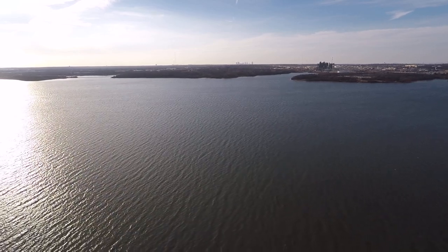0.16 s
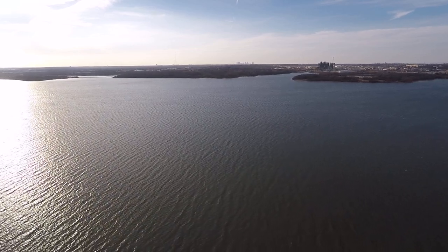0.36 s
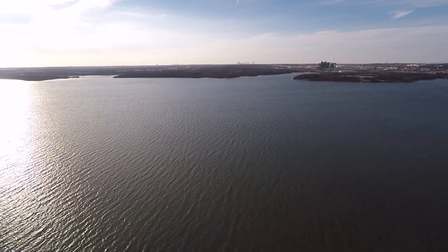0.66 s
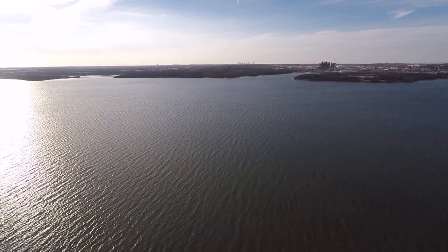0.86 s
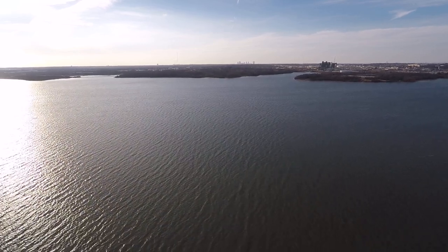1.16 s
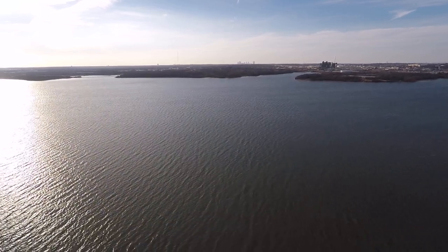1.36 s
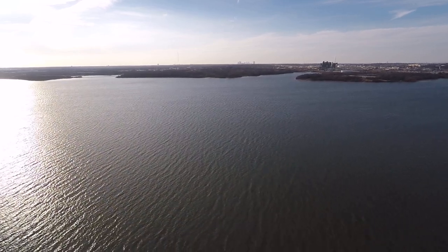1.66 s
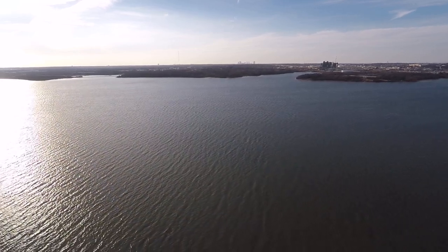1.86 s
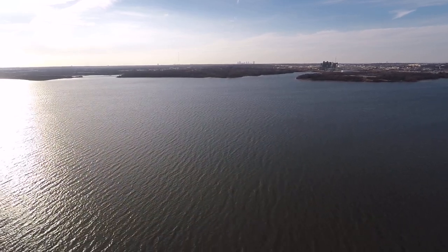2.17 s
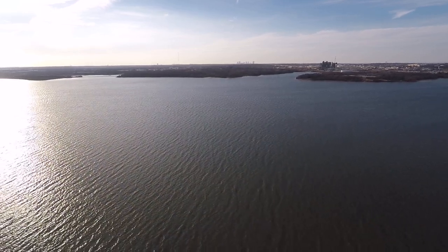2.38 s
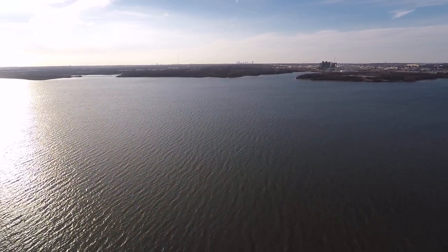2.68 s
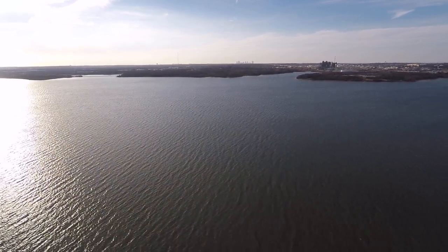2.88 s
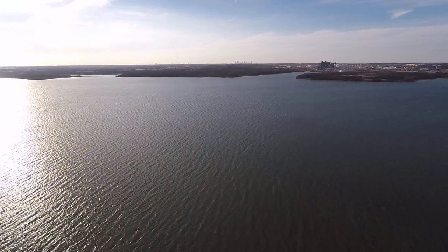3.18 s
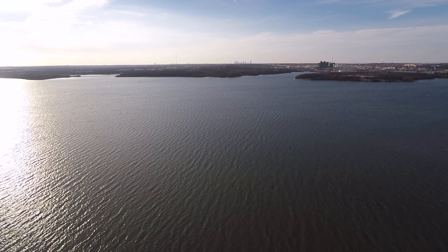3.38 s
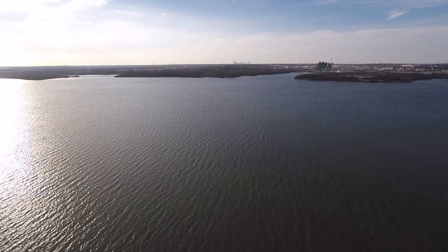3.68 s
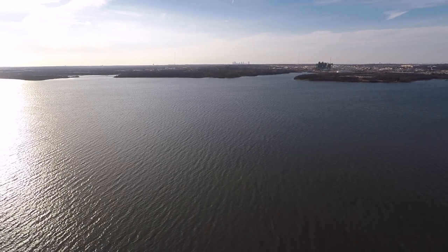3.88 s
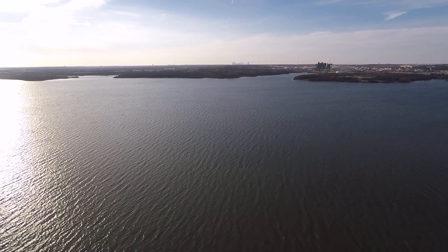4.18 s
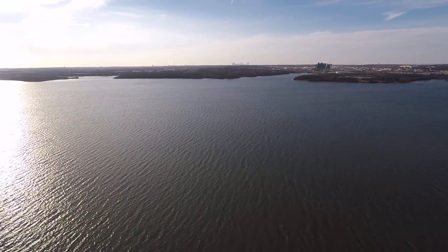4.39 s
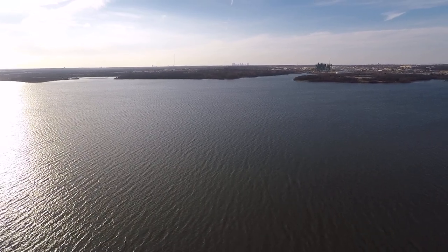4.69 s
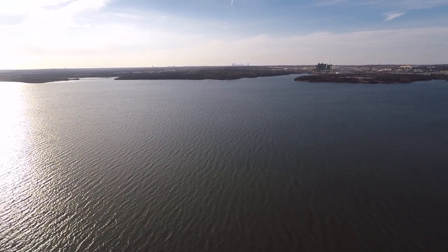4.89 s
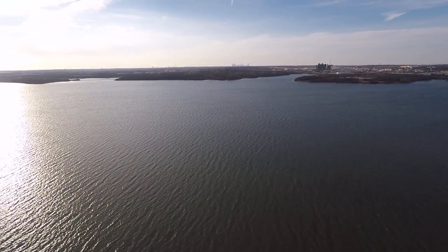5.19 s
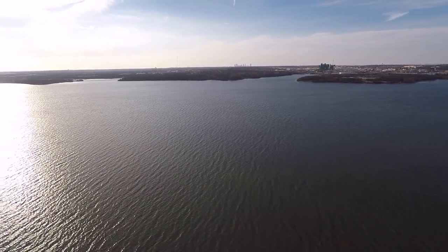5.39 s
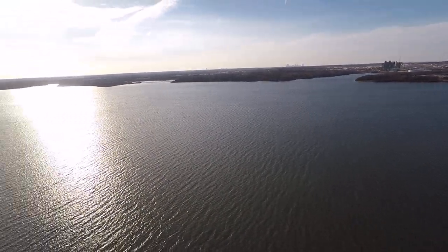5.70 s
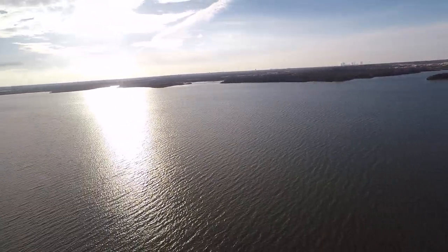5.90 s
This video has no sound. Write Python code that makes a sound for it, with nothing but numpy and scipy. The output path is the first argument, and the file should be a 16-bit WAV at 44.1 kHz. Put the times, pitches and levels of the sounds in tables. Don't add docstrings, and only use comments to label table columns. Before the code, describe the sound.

Steady rapid blade flutter and low hum in rumbling wind, breaking after three seconds into uneven roar, motor chirps, hiss and popping gusts.

```python
import sys
import numpy as np
from scipy import signal
from scipy.fft import rfft, irfft
from scipy.io import wavfile
from scipy.ndimage import uniform_filter1d

SR = 44100
rng = np.random.default_rng(int(sys.argv[2]) if len(sys.argv) > 2 else 0)


def ratio(d):
    e = np.asarray(d, float) / 20
    return 10 ** e


def inscribe(sig):
    pcm = np.round(np.clip(np.atleast_2d(sig).T, -1, 1) * 32767)
    wavfile.write(sys.argv[1], SR, pcm.astype(np.int16))


N = 266800
TIME, HZ = np.arange(N) / SR, np.fft.rfftfreq(N, 1 / SR)

# t/s, level/dB
WIND = [(0, -18), (1.41, -17), (1.54, -24), (1.65, -17.5), (3.16, -17.5), (3.3, -24), (3.75, -26.5),
        (3.93, -21), (3.99, -17), (4.47, -14), (4.6, -27.5), (4.87, -17.5), (5.17, -16.5), (5.44, -13),
        (5.52, -23), (5.56, -12), (5.76, -20.5), (6.05, -19)]
# f/Hz, density/dB per Hz
RUMBLE = [(20, -13), (40, -1), (80, 7), (150, 6), (190, -3), (230, -8), (400, -14), (800, -68)]
# f/Hz, density/dB per Hz
BUFFET = [(120, -31), (200, 4), (260, 3.5), (400, -4), (800, -52)]
# t/s, motor effort/dB, airspeed at the blade tips/dB
MOTORS = [(0, -3, 1.5), (3.03, 1, 1), (3.18, -3.5, -1), (3.45, 1.5, 4), (3.82, 4, 8), (4.11, 2.5, 12.5),
          (4.48, 0, 7.5), (4.7, 6, 7), (5.06, 7, 9.5), (5.27, 7.5, 11), (5.42, 6.5, 10.5), (5.62, 5.5, 7.5),
          (5.68, 2, -1), (5.9, 0, 4), (6.05, 4, 7)]
# f/Hz, density/dB per Hz
ROAR = [(200, -26), (400, 3), (800, 3), (1500, -2), (3000, -10), (3900, -13), (5000, -20), (7000, -39.5),
        (10000, -55)]
# f/Hz, density/dB per Hz
HISS = [(2200, -30), (4200, 5), (6000, 2), (8000, 0), (9700, -2), (11000, -7), (12500, -5), (13600, -9),
        (15500, -7)]
# t/s, length/s, start f/Hz, end f/Hz, level/dB
SPURS = [(3.29, .07, 4020, 3900, -47), (3.365, .1, 3870, 3960, -43), (3.54, .12, 3540, 3960, -42),
         (3.66, .06, 3940, 3880, -45), (3.79, .1, 3500, 3930, -41), (3.88, .13, 3250, 4000, -41),
         (4.05, .07, 3540, 3620, -39), (4.14, .11, 3900, 4030, -42), (4.19, .11, 3640, 3500, -40),
         (4.318, .15, 3660, 3720, -40), (4.64, .21, 3660, 3930, -41), (4.87, .29, 3800, 3830, -41),
         (4.88, .17, 3580, 3630, -44), (5.16, .07, 3860, 3800, -41), (5.23, .09, 3760, 3880, -40),
         (5.32, .14, 3680, 3874, -39), (5.49, .14, 3780, 3960, -40), (5.677, .12, 3820, 3800, -48),
         (5.9, .08, 3850, 3870, -50)]
# t/s, peak level/dB, f/Hz
BLOWS = [(0.207, -10, 674), (0.253, -4, 680), (0.861, -12, 622), (3.157, -3, 918), (3.184, -18, 560),
         (3.261, -5.5, 609.3), (3.967, -9, 586), (3.989, -3, 552), (4.116, -2, 665), (4.146, -1, 590),
         (4.211, -6, 570), (4.306, 1.5, 650), (4.312, -2.5, 734), (4.318, -10, 552), (4.332, -5.5, 587),
         (4.352, -2.5, 630), (4.375, -1, 695), (4.387, 4, 550), (4.421, 0, 830), (4.554, -14, 592),
         (4.64, -4, 573), (4.665, -6, 567), (4.707, -10, 567), (4.858, -12, 840), (5.354, -0.5, 527),
         (5.657, 0, 571), (5.733, -6, 579), (5.981, -6, 711)]
# t/s, peak level/dB, top end relative level/dB
CRACKS = [(0.242, -18, -29), (0.3031, -12, -20), (0.343, -18, -24), (.4012, -18.5, -17), (.6951, -10, -24),
          (.7791, -13, -8), (.811, -13, -19), (0.9292, -14, -26), (1.1505, -13, -23), (1.1725, -14, -12),
          (1.4114, -19, -31), (1.681, -15, -29), (1.9902, -15, -22), (2.0883, -12.5, -24),
          (2.5028, -11, -33), (2.802, -18, -28), (2.9627, -13, -24), (3.038, -14, -8), (3.263, -24, -22),
          (4.3054, -15, -26), (4.3893, -16, -29), (4.4573, -9.5, -30), (4.4623, -10, -24),
          (4.5077, -11, -35), (4.561, -13, -17), (4.5858, -11, -24), (5.238, -10, -24), (5.6287, -11, -22),
          (5.6657, -14.5, -8), (5.7513, -14, -29)]
# t/s, peak level/dB, top end relative level/dB
CRACKLE = [(3.0715, -17, -10), (3.0864, -18, -16), (3.1014, -17, -25), (3.1133, -21, -14),
           (3.1187, -18, -12), (3.1238, -11, -9), (3.1403, -16, -1), (3.1466, -18, -12), (3.157, -21, -22),
           (3.168, -18, -18), (3.1842, -22, -28), (3.1904, -24, -28)]
# t/s, level/dB
WASH = [(0, -20), (3.0, -20.5), (3.185, -18.5), (3.205, -28.5), (3.41, -43), (3.82, -42), (3.95, -38),
        (4.0, -24), (4.08, -26.5), (4.13, -22), (4.47, -21.5), (4.58, -18), (4.66, -24), (5.15, -26),
        (5.44, -23), (5.52, -23), (5.78, -17.5), (5.93, -35.5)]
# t/s, unrest/0-1, lumps in slap size/dB, treble tilt/dB a part
AIR = [(0, 0, 1.4, .5), (3.0, 0.04, 1.4, -0.5), (3.15, 0.32, 1, 2.5), (3.3, 1, 3.5, 1),
       (3.9, 0.7, 2.3, -1.5), (4.05, 0.62, 6, -0.5), (4.65, 0.42, 4.5, -2), (4.8, 1, 3, 1),
       (5.55, 0.64, 2.5, 1.5), (5.7, 0.77, 3, -1.5), (6.05, 1, 4, -4)]
# f/Hz, density/dB per Hz
SLAP = [(60, -18.5), (150, -8), (300, -9.5), (550, -11), (1000, -17.5), (2000, -24.5), (4000, -37.5),
        (7000, -53), (10000, -60), (15500, -95)]
# centre f/Hz, length/ms, own size scatter level/dB
PARTS = [(305, 2.57, -0.5), (980, 1.48, 0), (2540, 1.08, -2.5), (5650, 0.54, 4.5), (12200, 0.4, 19)]
# t/s, blade passes/Hz, hum level/dB
ROTOR = [(0, 181, -20), (.36, 186, -16), (.6, 181, -18), (1.2, 178, -17.5), (1.45, 186.4, -17),
         (1.92, 186.5, -15), (2.02, 177, -17), (2.36, 182, -18.5), (2.55, 178.6, -17.5), (3.05, 186, -18),
         (3.14, 199, -18), (3.27, 171, -26.5), (3.45, 156, -26.5), (3.93, 155, -25), (4.4, 169, -27.5),
         (4.62, 170, -17), (5.75, 173.5, -17.5), (6.05, 176, -30)]
# multiple of the blade rate, level relative to the second tone/dB
HUM = [(3, -12), (4, -12), (5, -12), (7, -19)]
# t/s, length/s, depth level/dB
GAPS = [
    (0.51, 0.065, -5),
    (0.744, .07, -7),
    (4.1, .25, -19),
    (4.497, 0.061, 2),
    (4.83, .09, -13),
    (4.997, 0.16, -5.5),
    (5.5, 0.062, -3),
    (5.687, .04, -12.5),
]


def evened(x, size=N):
    return x / np.sqrt(abs(uniform_filter1d(x ** 2, size)) + 1e-20)


def curves(rows, t=TIME):
    s, *columns = np.transpose(rows)
    return [np.interp(t, s, c) for c in columns]


def coloured(x, points):
    f, db = np.transpose(points)
    return irfft(rfft(x) * ratio(np.interp(np.log(HZ + 1), np.log(f), db)), N)


def drift(rate_hz):
    return evened(irfft(rfft(rng.standard_normal(N)) / (1 + (HZ / rate_hz) ** 4), N))


def burst(at, size, ms):
    train = np.bincount(at, size, N)[:N]
    bell = np.exp(-.5 * (np.arange(-300, 301) / SR / (ms / 2000)) ** 2)
    return signal.oaconvolve(train, bell, "same")


def wind():
    wash_db, turn = curves(WASH)[0], curves(AIR)[0]
    buffet_db = -21.5 + 1.06 * (wash_db + 20.5) + 7.5 * turn
    air = rng.standard_normal(N) * ratio(0.59 * drift(22))
    rumble = ratio(curves(WIND)[0] + 1.35) * evened(coloured(air, RUMBLE), size=SR // 4)
    return rumble + ratio(buffet_db - 4.5) * evened(coloured(air, BUFFET), size=SR // 8)


def motors():
    effort_db, tips_db = curves(MOTORS)
    roar_db, hiss_db = -32.5, -53
    air = rng.standard_normal(N) * ratio(1.57 * drift(270))
    roar = ratio(roar_db + effort_db) * evened(coloured(air, ROAR))
    return roar + ratio(hiss_db + tips_db) * evened(coloured(air, HISS))


def whine(turns):
    line_db = -47.5 - 10 * curves(AIR)[0] + 2.5 * drift(8)
    out = ratio(line_db) * np.sin(2 * np.pi * 21 * turns)
    waver, flutter = 1 + .005 * drift(30), ratio(1.8 * drift(25) - 1)
    for s, length, start_hz, end_hz, db in SPURS:
        part = slice(round(s * SR), round((s + length) * SR))
        glide = np.linspace(start_hz, end_hz, part.stop - part.start)
        partner_db = -57 + 1.5 * abs(end_hz - start_hz) / length / 1000
        cycles = np.cumsum(glide * waver[part]) / SR
        partner = ratio(partner_db - db) * np.sin(2 * np.pi * cycles * 4 / 3)
        orders = np.sin(2 * np.pi * cycles) + partner
        out[part] += ratio(db) * flutter[part] * orders * signal.windows.tukey(len(glide), .3)
    return out


def blows():
    out = np.zeros(N + SR)
    for s, db, hz in BLOWS:
        u = np.arange(0, 4, hz / SR)
        swing = -np.sin(2 * np.pi * u ** 0.54 * 1.18) * u * np.exp(-u / 0.48)
        start = round((s + .0012) * SR)
        out[start:][:len(u)] += ratio(db - 2.5) * swing / abs(swing).max()
    s, db = np.transpose(BLOWS)[:2]
    edge = ((s + .0015) * SR).astype(int)
    spit = rng.standard_normal(N) * burst(edge, ratio(db + 3), 1.1)
    return out[:N] + coloured(spit, [(300, -36), (900, -4), (2000, -19.5), (4000, -16.5), (8000, -44)])


def cracks():
    s, crack_db, top_db = np.transpose(CRACKS + CRACKLE)
    at = (s * SR).astype(int) + 30
    air = evened(rng.standard_normal(N), size=30)
    bright = [(1200, 3), (3000, 5.5), (6000, -3.5), (9000, -32)]
    top = [(5000, -6), (8000, 12.5), (11000, 0), (15900, -20)]
    crack = coloured(air * burst(at, ratio(crack_db - 3.0), 1.25), bright)
    return crack + coloured(air * burst(at, ratio(crack_db + top_db - 8), 0.37), top)


def slaps(turns):
    at = np.flatnonzero(np.diff(np.floor(turns)) > 0)
    unrest, spread_db = curves(AIR, at / SR)[:2]
    calm_scatter, rough_scatter = 0.099, 0.27
    scatter = calm_scatter + (rough_scatter - calm_scatter) * unrest
    luck = rng.standard_normal((2 + 2 * len(PARTS), len(at)))
    period = SR / curves(ROTOR, at / SR)[0]
    shared_db = spread_db * luck[1] + 1.0 * (-1.) ** np.arange(len(at))
    air, spectrum = rng.standard_normal(N), 0
    tilt_db = curves(AIR)[2]
    centres = np.log([p[0] for p in PARTS])
    for k, (hz, ms, own_db) in enumerate(PARTS):
        place = at + period * (scatter * luck[0] + 0.047 * luck[2 + 2 * k])
        size = ratio(shared_db + own_db * luck[3 + 2 * k])
        envelope = burst(np.clip(place, 0, N - 1).astype(int), size, ms)
        envelope = evened(envelope, size=SR // 8) + .2
        envelope *= ratio(tilt_db * (k - 3))
        share = np.interp(np.log(HZ + 1), centres, np.arange(len(PARTS)) == k)
        spectrum = spectrum + share * rfft(air * envelope)
    wash = evened(coloured(irfft(spectrum, N), SLAP), size=SR // 6)
    return ratio(curves(WASH)[0] + 4.5) * wash


def hum(turns):
    first_db = curves(ROTOR)[1]
    for s, length, depth_db in GAPS:
        first_db = first_db + depth_db * np.exp(-((TIME - s) / (length / 2)) ** 2)
    lumps_db = curves(AIR)[1]
    second_db = first_db - 4.5 - 1.34 * lumps_db
    levels = [(1, first_db), (2, second_db)] + [(k, second_db + db) for k, db in HUM]
    near = 0
    for k, db in levels:
        flutter_db = (1 + .4 * lumps_db) * drift(11)
        near = near + ratio(db + flutter_db) * np.cos(2 * np.pi * k * turns + 2.59)
    far_hz, far_db, far_second_db = 187, -32, -13
    phase = 2 * np.pi * np.cumsum(far_hz * (1 + .015 * drift(3.83))) / SR
    far_tones = np.sin(phase) + ratio(far_second_db) * np.sin(2 * phase)
    return np.sqrt(2) * (near + ratio(far_db + 0.59 * drift(8)) * far_tones)


def scene():
    turns = np.cumsum(curves(ROTOR)[0] * (1 + .006 * drift(12))) / SR
    background = wind() + motors() + whine(turns)
    return (background + blows() + cracks() + slaps(turns) + hum(turns))[None]


def roll_off(x):
    return signal.sosfilt(signal.butter(12, 15960, fs=SR, output="sos"), x)


def record(dry):
    ceiling, knee = .96, 4
    limited = dry / (1 + abs(dry / ceiling) ** knee) ** (1 / knee)
    edge = signal.firwin(1001, 15290, window=("kaiser", 7), fs=SR)[None]
    padded = np.pad(limited, ((0, 0), (500, 500)), "reflect")
    passed = signal.oaconvolve(padded, edge, "valid")
    mix = passed + ratio(-44) * (limited - passed)
    return roll_off(mix)


dry = scene()
out = record(dry)
inscribe(out)
```